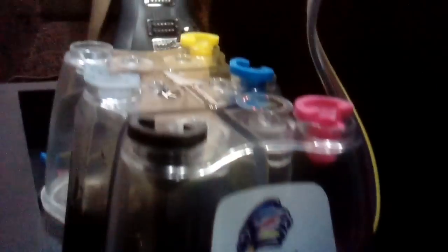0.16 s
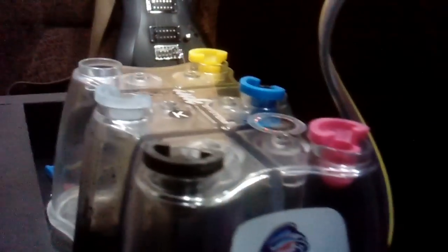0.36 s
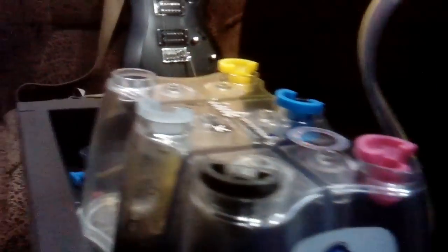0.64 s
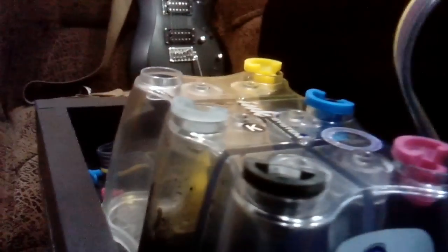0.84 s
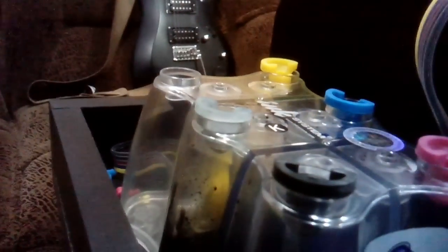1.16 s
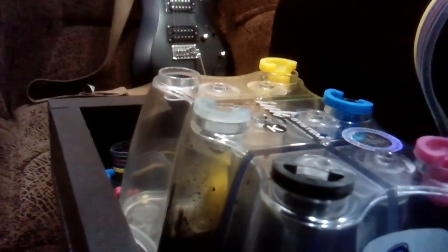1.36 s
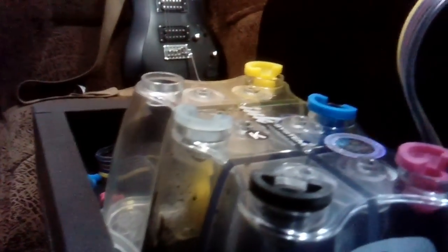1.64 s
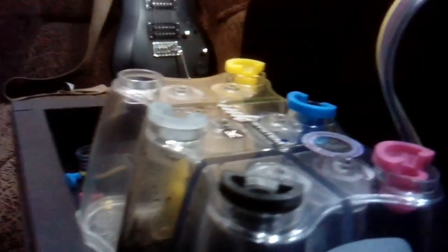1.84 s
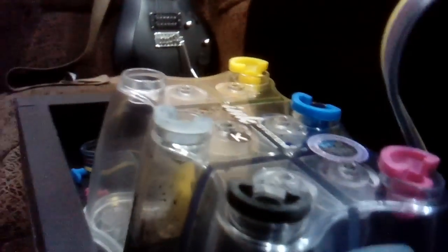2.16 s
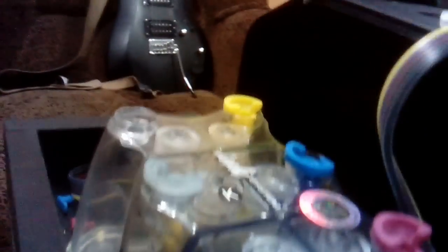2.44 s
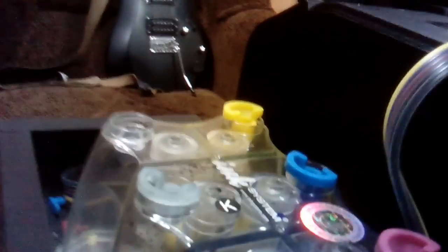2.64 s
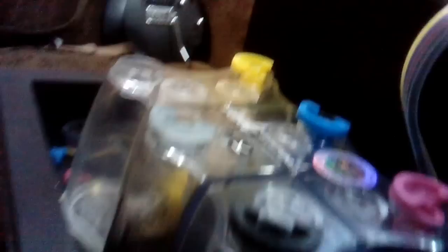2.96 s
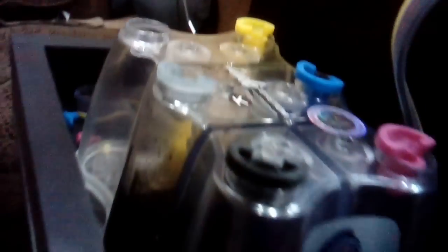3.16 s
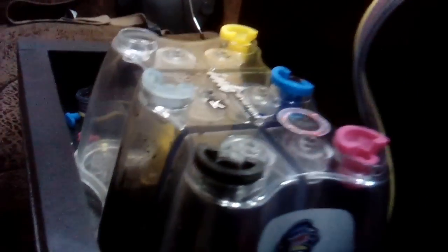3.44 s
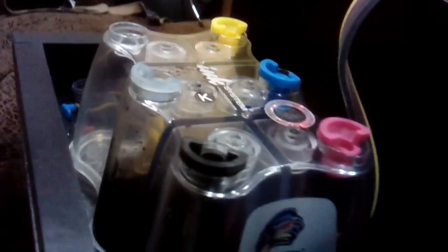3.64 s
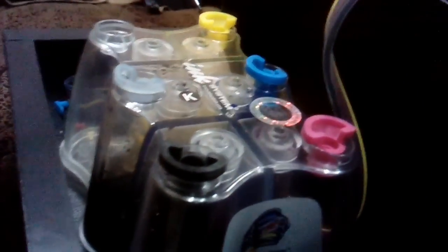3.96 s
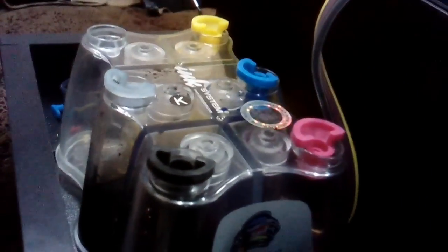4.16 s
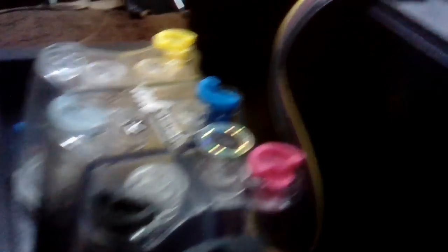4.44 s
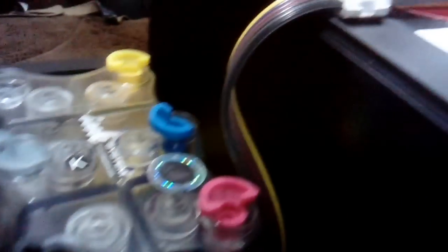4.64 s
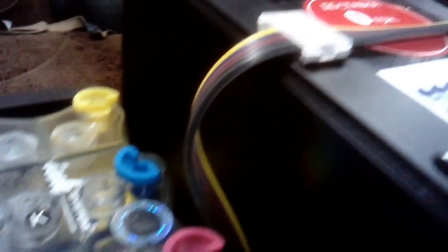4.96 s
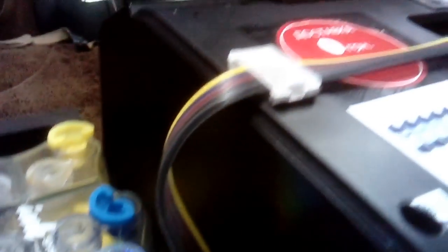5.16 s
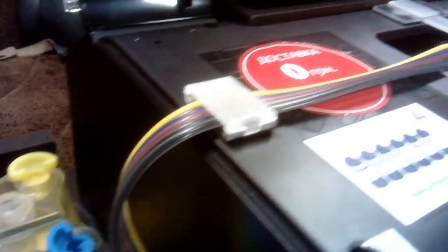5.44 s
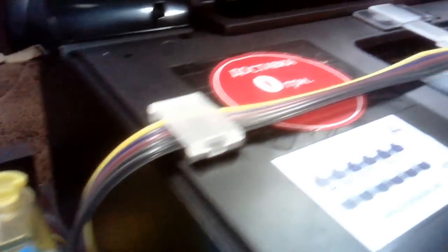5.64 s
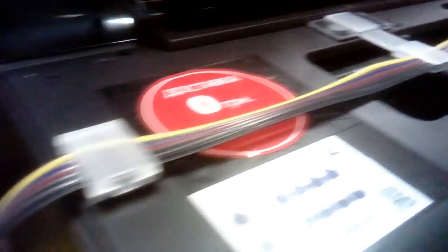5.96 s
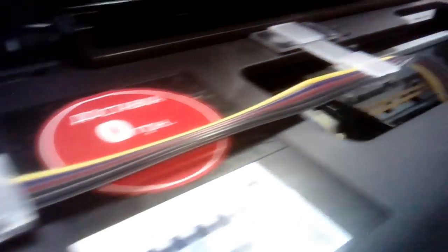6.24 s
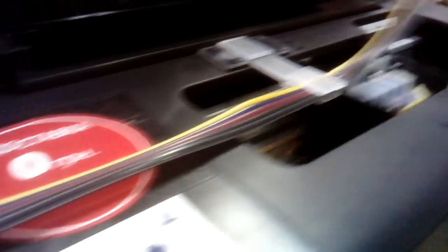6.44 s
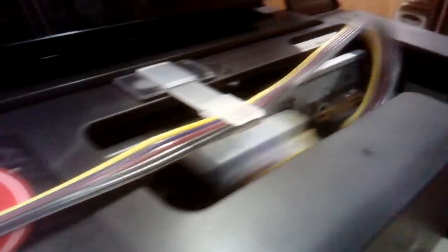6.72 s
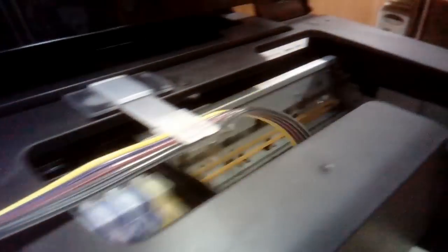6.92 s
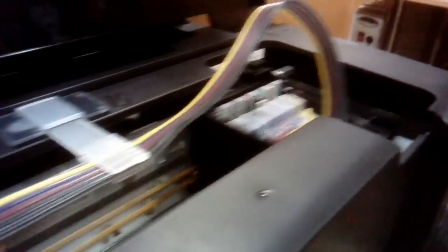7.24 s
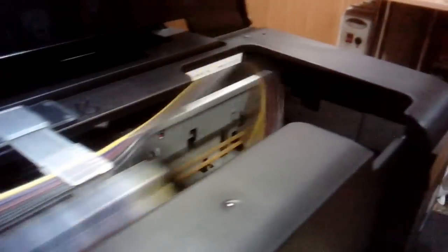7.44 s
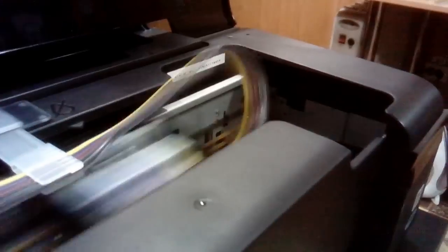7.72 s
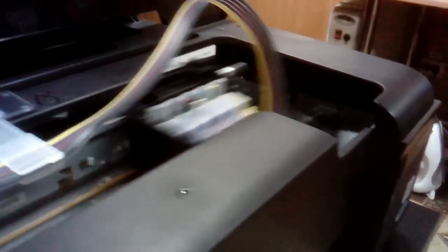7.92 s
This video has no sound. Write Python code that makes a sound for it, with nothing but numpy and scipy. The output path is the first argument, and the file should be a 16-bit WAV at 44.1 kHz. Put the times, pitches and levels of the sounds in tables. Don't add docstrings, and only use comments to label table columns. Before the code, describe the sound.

An inkjet printer carriage runs back and forth in a small furnished room. Each pass brings a quick rising whirr, a loud hollow plastic clack with a double knock, then a slower hissing, whining return with light ticks. The cycle repeats about every 0.7 seconds, rests briefly after three seconds, then resumes. A small handheld microphone gives a close, thin, slightly dull sound.

```python
import sys
import numpy as np
from scipy import signal
from scipy.fft import rfft, irfft, next_fast_len
from scipy.io import wavfile
from scipy.ndimage import uniform_filter1d

SR = 44100
rng = np.random.default_rng(int(sys.argv[2]) if len(sys.argv) > 2 else 0)


def wrap_up_sound(samples):
    columns = np.atleast_2d(samples).T
    tamed = np.clip(columns, -1, 1)
    steps = np.round(tamed * 32767).astype(np.int16)
    wavfile.write(sys.argv[1], SR, steps)


def gain_from_db(level_db):
    decades = np.asarray(level_db, float) / 20
    return 10 ** decades


N = 356769

# clack_s, clack_peak_db, mid_ring_hz, camera_facing_db, latch_tick_db
SHUTTLES = [(-.0145, -11, 1950, -3, -43), (0.6666, -15.5, 1977, -3.5, -32.5),
            (1.3463, -16.5, 1989, -4.5, -34.5), (2.0271, -12.5, 1973, -3.5, -36),
            (2.7078, -11.5, 1956, -4, -28.5), (3.9303, -11, 1990, -1.1, -27),
            (4.6094, -12.5, 1976, -1, -27), (5.29, -13.5, 1969, -1, -30), (5.971, -12.5, 1872, -0.3, -30.5),
            (6.6523, -13.5, 1804, -0.5, -31.5), (7.3331, -13, 1826, -1.5, -32),
            (8.0146, -17, 1709, -2, -34)]

# after_clack_s, tooth_hz
FAST_STROKE = [(-.135, 302), (-.08, 580), (-.06, 679.8), (-.03, 775), (0, 799), (.03, 933), (.085, 1027),
               (.115, 902), (.173, 409.3)]
PRINT_STROKE = [(.191, 320.6), (.215, 479.6), (.24, 535.4), (.265, 550.8), (.283, 568), (.30, 606),
                (.465, 618.8), (.50, 551), (.525, 440.4), (.545, 301)]

# again_s, again_peak_db, rebound_db, turn_db, feed_snap_db
FOLLOWERS = [(0.0047, -24, -29.5, -32.5, -5), (0.0055, -17, -25.5, -33.5, -1),
             (.007, -13.5, -25.5, -30.5, -5), (.007, -19.5, -26, -31.5, -1.5),
             (0.0074, -18.5, -24, -30.5, -16), (.007, -16, -22.5, -26, 3.5), (.0072, -13, -24.5, -29, 4),
             (0.0055, -13.5, -21, -27.5, 4), (0.0085, -15.5, -21.5, -28, 5.5), (0.005, -14.5, -24, -30, 7),
             (0.0029, -17.5, -25.5, -29.5, 5), (0.006, -18, -25, -31, 0)]
# after_clack_s, peak_db, ring_hz
FEED_KNOCK = (.388, -28.5, 1840)
# after_clack_s, peak_db, ring_hz
GEAR_TICK = (.332, -35, 1830)
# after_clack_s, ring_hz
TURN_TICK = (.150, 1530)
# start_s, peak_db
START_KNOCKS = [(0.538, -25), (1.221, -26.5), (1.901, -27.5), (2.579, -30), (3.737, -36.5), (3.814, -22),
                (4.480, -28), (5.165, -26), (5.845, -25.5), (6.527, -25.5), (7.206, -27), (7.889, -27)]
# mode_hz, t60_s, level_db, camera_moved_extra_db
START_MODES = [(170, .08, 4.5, 0.5), (200, 0.083, 5.5, -2), (258, .07, 5, -2), (321, 0.055, -1, -1),
               (372, .06, -3, 2.5), (448, 0.079, -0.5, 3.5), (560, .05, -7.5, 5.5), (640, .05, -10.5, 3.5),
               (837, .045, 7, -4)]
# start_s, peak_db, ring_hz, brightness_db
SETTLE_KNOCK = [(3.367, -42.5, 1586, -1)]

# mode_hz, t60_s, knock_db, rumble_db
FRAME_LOW = [(127, 0.12, -22.5, 8), (194.8, 0.083, -2, 2.5), (268.4, 0.07, -30.5, 3.5),
             (319.5, 0.047, 3, 3), (359.4, 0.07, -12, 3.5), (448.2, 0.095, -2.5, 2), (519, 0.074, -6, 3.5),
             (555, 0.12, 2, -1), (624.5, 0.051, 2, 8), (775, 0.094, 1, -22), (880, 0.13, -3, -16),
             (933, 0.07, 0.5, -25.5), (1121, 0.11, -10.5, -15.5), (1195, 0.079, -2, -13)]
LOW_MOVED_DB = [-0.5, 2, -1.5, 1.5, 4, 5.5, -2.5, 1, -3, 2, 3, -2.5, 10.5, -1.5]
# mode_hz, t60_s, knock_db, rattle_db, camera_moved_extra_db
FRAME_MID = [(1254, 0.015, -18, 10.5, 12), (1429, 0.024, -13, 3.5, 5.5), (1538, 0.026, -13.5, 8.5, 1),
             (1767, 0.025, -17, 2, 1.5), (1871, 0.023, -6, -0.5, 8), (1974, 0.021, 4, 5.5, -5),
             (2026, 0.038, -10.5, -8.5, -2.5), (2126, 0.024, -9.5, -1.5, -9.5),
             (2212, 0.021, -14.5, -9.5, 3.5), (2314, 0.036, -11, 0, 0.5)]
# mode_hz, t60_s, knock_db
FRAME_HIGH = [(2880, 0.027, -12.5), (3310, 0.0029, -1), (3986, 0.016, -9.5), (4260, 0.0097, -9.5),
              (4730, 0.011, -5), (5010, 0.013, -8), (5502, 0.0095, 3.5), (5750, 0.0053, 5.5),
              (6403, 0.0084, 1.5), (6790, 0.0076, 1.5), (7150, 0.0047, 4), (7280, 0.019, -19.5)]
# mode_hz, t60_s, knock_db, rattle_db
BAY_MODES = [(1058, 0.022, 0, 2), (1144, 0.022, 0, -2.7)]
# time_s, level_db
BAY_APPROACH = [(5.5, -27), (6.3, -5.5), (8.1, 1)]

# from_s, to_s, rumble_db, rattle_db
JOLTS = [
    (-.105, -0.035, -48, -57),
    (0.019, 0.036, -33, -39),
    (.06, 0.08, -36, -42),
    (.15, .192, -38, -46.5),
    (.298, 0.309, -36.5, -42),
    (0.343, 0.418, -45.5, -48.5),
    (.495, 0.507, -47.5, -55.5),
]
# after_clack_s, ring_hz, t60_s, early_peak_db,
# later_peak_db
THUMPS = [(-.11, 450, .06, -55.5, -43), (-.1, 297.4, 0.087, -50.5, -45.5), (0.048, 200, 0.07, -33.5, -48),
          (.052, 558, 0.07, -36, -35), (0.097, 187.6, 0.085, -44, -39.5), (.15, 340, 0.11, -43, -41.5),
          (.18, 375, 0.099, -43, -38.5), (.205, 170.7, 0.24, -39, -35), (.17, 800, 0.04, -48, -46),
          (0.13, 1580, .04, -43, -41), (0.31, 457, 0.038, -49.5, -39), (0.39, 320, .08, -43, -47),
          (.40, 190, 0.095, -47.5, -50)]
# after_clack_s, length_s, from_hz, to_hz, level_db
PUSHES = [
    (-.13, 0.08, 478.7, 225, -38.5),
    (0.144, 0.14, 449.9, 151, -42.5),
    (.28, .16, 600, 293, -39.5),
]

# tooth_rate_multiple, level_db
OUT_ORDERS = [(1, -8), (1.6, 1), (2, 2.5), (4, -14), (5, 3)]
BACK_ORDERS = [(1, -7), (2, 1.5), (3, -6), (4, -14), (5, -15), (6, -13), (7, -10)]
# taut_s, slack_s, level_db, rise_db_per_s
PULLS = [
    (-.062, 0.012, -46, 10),
    (0.255, 0.484, -42, -31),
]
# after_clack_s, first_order_db, second_early_db, second_later_db, higher_db
TENSION = [(.24, -14, -6, 0, -18), (.28, -11, -2, 4, -16), (.30, 1, 1.5, 2, 0), (.32, 1, 5, 6, 0),
           (.34, -3, -3, 1, 2), (.36, -10, 2.5, 5, 1), (.38, -20, -1, 2.5, 1), (.40, 6, 0, 1, 1),
           (.42, 4, -6, 2.5, 0), (.44, 1, -14, -4, 1), (.465, 1, -5, 3, -1), (.48, 0, -2, -4, -4),
           (.5, -1, -8, -9, -6)]
# centre_hz, width_hz, level_db
RADIATION = [(605, 90, 0), (790, 90, -3), (1155, 45, -6), (1222, 50, 0), (1500, 160, -.5), (1835, 150, .3),
             (2450, 200, -2.5), (3750, 600, -2.5), (4900, 500, -.6), (5600, 700, -1.5), (6900, 900, -.7)]

# freq_hz, density_db_per_hz
OUT_HISS = [(1290, -33), (2200, -14), (2750, -19), (3800, -5.5), (4130, -8.5), (4950, -6.5), (6910, -3.5),
            (7360, -2.5), (7800, -17.5), (10100, -42), (17200, -120)]
BACK_HISS = [(1290, -33.5), (2200, -8), (2720, -17), (3640, -12), (4000, -8.5), (6080, -7), (6940, -2),
             (7400, -3), (7800, -20.5), (10100, -68.5), (17200, -120)]

# freq_hz, gain_db
SMALL_BODY = [(25, -18.5), (100, -19.5), (160, -7.5), (250, 2), (2300, -2.07), (2700, 4.5), (3300, 0.09)]
# freq_hz, gain_db
LID_DIP = [(2100, -40), (2350, 0), (2950, 0), (3250, -40)]
# time_s, share_0_to_1
LID_SHARE = [(0, .3), (5.6, .3), (6.4, .6), (8.1, .65)]
CAMERA_MOVES_S = (3.3, 4.8)

# freq_hz, density_db_per_hz
ROOM_AIR = [(24, -69), (40, -40), (76, -14.5), (172, 3.5), (224, -11), (406, -1.5), (552, -9.5),
            (603, -3.5), (804, -11.5), (1400, -11), (2890, -18), (5130, -16.5), (7800, -18), (10100, -58.5),
            (17200, -120)]
# hum_hz, level_db
HUM = [(602.9, -74)]
# freq_hz, gain_db
MICROPHONE = [(7200, 0.97), (7500, -4), (7750, -10), (7900, -67)]
# freq_hz, gain_db
IMAGE = [(8150, -6.5), (8500, -15), (8900, -41.5), (9300, -40.5), (11000, -50.5), (14000, -64),
         (16000, -88)]

CRUISE_HZ, WAVER = 611, .004
TURN_S, REVERSE_S = 0.19, .182
LINGER_S, PARK_S, UNPARK_S = .005, .07, .065
HISS_FACING, RUMBLE_FACING, RUMBLE_TRIM_DB = 0.48, 0.77, -4

REBOUND_S, LATCH_S, LATCH_HZ, START_HZ = .06, .288, 1769, 1520
SOFT_REBOUND_EARLY_S = 0.0067
BLOW, BLOW_S = 6, .0004
SAME_KNOCK, SAME_SHAKE = .85, .7
JOLT_RISE_DB_PER_S, JOLT_FALL_DB_PER_S = 799, 425
THUMP_RISE_S = 0.0061
GROWL_SAG_DB = -10
TAUT_DB_PER_S, SLACK_DB_PER_S = 445, 513

HISS_POWER, BRAKE_DB, FULL_BRAKE_HZ_PER_S, AWAY_DB_PER_S = 4.56, -4.5, 7300, -21.5
FAST_KNEE_HZ, FAST_HISS_DB, PRINT_KNEE_HZ, PRINT_HISS_DB = 751, -38.5, 600, -39.5
RATTLE_UNDER_HISS_DB, RUN_UP_DB = -8, -3
UNLATCHED_DB = -2.5
RAIL_RING_DB, RAIL_RING_T60_S = -18.5, 0.14
TEETH_PER_TURN, PULLEY_SHARE, SAME_RAIL = 4, .4, .5
ROOM_DB, FIRST_SR = -62.5, 16000


def level(x, db):
    return x * gain_from_db(db) / np.sqrt(np.mean(x ** 2))


def colour(x, points):
    size = next_fast_len(len(x) + SR // 4)
    hz, db = np.transpose(points)
    at = np.log(np.fft.rfftfreq(size, 1 / SR) + 1)
    gain = gain_from_db(np.interp(at, np.log(hz), db))
    return irfft(rfft(x, size) * gain, size)[:len(x)]


def walk(rate):
    k = int(SR / rate)
    steps = np.repeat(rng.standard_normal(N // k + 1), k)
    return 1.3 * uniform_filter1d(uniform_filter1d(steps, k), k)[:N]


def ring(modes, gains_db):
    t = np.arange(int(.75 * max(m[1] for m in modes) * SR)) / SR
    signs = (-1) ** np.arange(len(modes))
    gains = signs * gain_from_db(np.array(gains_db))
    return sum(g * np.sin(2 * np.pi * m[0] * t) * np.exp(-np.log(1000) * t / m[1])
               for m, g in zip(modes, gains))


def moved(t):
    return np.interp(t, CAMERA_MOVES_S, (0, 1))


def held(s, start, end, rise_db, fall_db):
    return -rise_db * np.maximum(start - s, 0) - fall_db * np.maximum(s - end, 0)


def shuttle_laws(s):
    hz = np.interp(s, *np.transpose(FAST_STROKE + PRINT_STROKE))
    slowing = -uniform_filter1d(np.gradient(hz, s), size=40)
    braking = np.clip(slowing / FULL_BRAKE_HZ_PER_S, 0, 1)
    back = s > REVERSE_S
    slow = np.minimum(hz / np.where(back, PRINT_KNEE_HZ, FAST_KNEE_HZ), 1)
    print_db = PRINT_HISS_DB + AWAY_DB_PER_S * np.maximum(s - LATCH_S, 0)
    top_db = np.where(back, print_db, FAST_HISS_DB)
    hiss_db = top_db + 20 * HISS_POWER * np.log10(slow) + BRAKE_DB * braking
    whine_db = np.max([db + rise * (s - a) + held(s, a, b, TAUT_DB_PER_S, SLACK_DB_PER_S)
                       for a, b, db, rise in PULLS], axis=0)
    jolts = np.array([held(s, a, b, JOLT_RISE_DB_PER_S, JOLT_FALL_DB_PER_S) for a, b, _, _ in JOLTS])
    rumble_db, rattle_db = (np.max(jolts + db[:, None], axis=0) for db in np.transpose(JOLTS)[2:])
    running_db = hiss_db + RATTLE_UNDER_HISS_DB + RUN_UP_DB * (s < 0)
    return hz, whine_db, hiss_db, rumble_db, np.maximum(rattle_db, running_db)


def motion():
    clack, _, _, facing, _ = np.transpose(SHUTTLES)
    marks = np.array([FAST_STROKE[0][0], -.07, -.02, .4, .46, PRINT_STROKE[-1][0]])
    pause = np.diff(clack) > 1
    late = LINGER_S + PARK_S * np.append(pause, 0)
    early = UNPARK_S * np.append(0, pause)
    t = np.arange(N) / SR

    def within(lead):
        real = clack[:, None] + marks
        real = real + np.outer(late, [0, 0, 0, 0, 1, 1]) - np.outer(lead, [1, 1, 0, 0, 0, 0])
        nominal = np.arange(len(clack))[:, None] + marks
        lap = np.interp(t, np.maximum.accumulate(real.ravel()), nominal.ravel())
        return (lap - marks[0]) % 1 + marks[0]

    moving = within(early)
    s = within(0 * early)
    grid = np.arange(marks[0], marks[-1], 1 / 1000)
    laws = shuttle_laws(grid)
    hz, whine_db, hiss_db, rattle_db = (np.interp(moving, grid, laws[k]) for k in (0, 1, 2, 4))
    rumble_db = np.interp(s, grid, laws[3])
    face_db = np.interp(t, clack + .2, facing)
    low_db = RUMBLE_TRIM_DB + RUMBLE_FACING * face_db
    rest_db = -40 * (moving > marks[-1])
    return (s, hz, whine_db + face_db + rest_db, hiss_db + HISS_FACING * face_db + rest_db,
            rumble_db + low_db + rest_db, rattle_db + face_db + rest_db, low_db)


def knocks(table, rattle_s, fade_s, trim_db, first=4, low=FRAME_LOW,
           ring_db=-1.2, ring_s=.019, later_db=0., mid_db=0.):
    out, pad = np.zeros(N + 2 * SR), SR
    t = np.arange(SR // 20) / SR
    shape = np.exp(-np.maximum(t - rattle_s, 0) / fade_s)
    blow = BLOW * first * (np.arange(len(t)) == int(BLOW_S * SR))
    same = rng.standard_normal(len(t))
    swell = (1 - np.exp(-t / 0.0017), 1, np.exp(-t / 0.032))
    for (s, peak_db, hz, bright_db), snap_db in zip(table, np.broadcast_to(mid_db, len(table))):
        own = rng.standard_normal(len(t))
        rattle = (np.sqrt(SAME_KNOCK) * same + np.sqrt(1 - SAME_KNOCK) * own) * shape + blow
        middle = sorted(FRAME_MID + [(hz, ring_s, ring_db, 0, 0)])
        banks = (low, middle, FRAME_HIGH)
        mid_shift_db = moved(s - 1.5) * np.array([m[4] for m in middle])
        shift_db = (moved(s) * np.array(later_db), mid_shift_db, 0)
        bank_db = peak_db + np.add(trim_db, (0, snap_db, bright_db))
        for modes, db, w, more_db in zip(banks, bank_db, swell, shift_db):
            gains_db = np.array([m[2] for m in modes]) + more_db + 1.0 * rng.standard_normal(len(modes))
            hit = signal.fftconvolve(rattle * w, ring(modes, gains_db))
            i = pad + int(s * SR)
            out[i:i + len(hit)] += gain_from_db(db) * hit / np.abs(hit).max()
    return out[pad:pad + N]


def latch_train():
    clack, db, hz, face_db, latch_db = np.transpose(SHUTTLES)
    again_s, again_db, rebound_db, turn_db, snap_db = np.transpose(FOLLOWERS)

    def rows(*cols):
        return np.transpose(np.broadcast_arrays(*cols, 0.))

    def after(knock, share):
        return rows(clack + knock[0], knock[1] + share * face_db, knock[2])[:-1]

    out = knocks(rows(clack, db, hz), 0.0047, 0.01, (-7, .9, -.4),
                 first=2.83, ring_db=7.0, later_db=LOW_MOVED_DB)
    out += knocks(rows(clack + again_s, again_db, hz), 0.003, 0.0063, (-8, -.9, -2.5),
                  first=1.4, ring_db=2.5, later_db=LOW_MOVED_DB)
    rebound_s = clack + REBOUND_S - SOFT_REBOUND_EARLY_S * np.append(0, np.diff(clack) > 1)
    out += knocks(rows(rebound_s, rebound_db, hz), 0.003, 0.0035, (-5, .9, -3),
                  first=1.9, ring_db=3.5, later_db=LOW_MOVED_DB)
    out += knocks(rows(clack + TURN_TICK[0], turn_db, TURN_TICK[1])[:-1], 0.0042, 0.004, (-4, -2, -2))
    out += knocks(rows(clack + LATCH_S, latch_db, LATCH_HZ)[:-1], 0.0032, 0.003, (-18, 2.5, 3.5),
                  first=6, ring_db=-5.5, ring_s=0.016)
    out += knocks(after(FEED_KNOCK, 0.5), 0.0039, 0.0071, (-3, -3, -16),
                  first=6.7, low=FRAME_LOW[2:9], ring_db=16.0, mid_db=snap_db[:-1])
    out += knocks(after(GEAR_TICK, 0.79), 0.0018, 0.0018, (-14, 0, -16), first=6.9, ring_db=10.0)
    out += knocks(rows(*np.transpose(START_KNOCKS), START_HZ), 0.0015, 0.012, (-9, -19, -23),
                  first=1.8, low=START_MODES, ring_db=7.0, later_db=[m[3] for m in START_MODES])
    return out + knocks(SETTLE_KNOCK, 0.0054, 0.013, (-.6, -25, -30), low=FRAME_LOW[:3])


def shake(s, modes, db, lumpy_db, rate):
    own, same = (rng.standard_normal(N) * gain_from_db(lumpy_db * walk(rate)) for _ in range(2))
    place = ((s - s.min()) * SR).astype(int)
    push = np.sqrt(SAME_SHAKE) * same[place] + np.sqrt(1 - SAME_SHAKE) * own
    shaken = signal.fftconvolve(push, ring(modes, [m[3] for m in modes]))[:N]
    return gain_from_db(db) * level(shaken, 0)


def thumps():
    out, t = np.zeros(N + 2 * SR), np.arange(SR // 5) / SR
    chances = rng.standard_normal((len(SHUTTLES), len(THUMPS), 2))
    for clack, chance in zip(np.transpose(SHUTTLES)[0], chances):
        for (s, hz, t60, db, later_db), (detune, lift) in zip(THUMPS, chance):
            i = SR + int((clack + s) * SR)
            swell = (1 - np.exp(-t / THUMP_RISE_S)) ** 2 * np.exp(-np.log(1000) * t / t60)
            wave = np.sin(2 * np.pi * hz * (1 + .02 * detune) * t) * swell / swell.max()
            out[i:i + len(t)] += gain_from_db(db + (later_db - db) * moved(clack) + 1.5 * lift) * wave
    return out[SR:SR + N]


def whine(s, back, hz, db):
    hz = np.where(back, np.minimum(1.03 * hz, CRUISE_HZ), hz) * (1 + WAVER * walk(30))
    phase = 2 * np.pi * np.cumsum(hz) / SR
    grid = np.arange(0, SR / 2, 10)
    response = np.sqrt(sum(gain_from_db(2 * g) / (1 + (2 * (grid - c) / w) ** 4) for c, w, g in RADIATION))
    at, *tension = np.transpose(TENSION)
    first, early, later, higher = (np.interp(s[back], at, d) for d in tension)
    turned = moved(np.arange(N) / SR)[back]
    tension_db = first + 4 * (1 - turned), early + (later - early) * turned, higher

    def tone(orders, rough, on):
        total = 0
        for k, g in orders:
            gain = gain_from_db(g + 5 * rough * walk(60)[on]) * np.interp(k * hz[on], grid, response)
            total = total + gain * np.sin(k * phase[on] + rough * np.sqrt(k) * walk(150)[on])
        return total

    out = np.zeros(N)
    out[~back] = tone(OUT_ORDERS, .3, ~back)
    out[back] = tone([(k, g + tension_db[min(k, 3) - 1]) for k, g in BACK_ORDERS], .16, back)
    return np.sqrt(2) * gain_from_db(db) * out


def hiss(s, hz, back, db, unlatched):
    turn = np.cumsum(hz) / SR / TEETH_PER_TURN % 1
    rims = rng.standard_normal((2, 300))
    lean = 0.8 * walk(25)
    pulley = sum(w * np.interp(turn, np.linspace(0, 1, rim.size), rim)
                 for rim, w in zip(rims, (np.cos(lean), np.sin(lean))))
    own, same = (rng.standard_normal(N) * gain_from_db(2.6 * walk(300)) for _ in range(2))
    place = ((s - s.min()) * SR).astype(int)
    rough = np.sqrt(SAME_RAIL) * same[place] + np.sqrt(1 - SAME_RAIL) * own
    rough = np.sqrt(1 - PULLEY_SHARE) * level(rough, 0) + np.sqrt(PULLEY_SHARE) * level(pulley, 0)
    out, ret = (level(colour(rough, points), 0) for points in (OUT_HISS, BACK_HISS))
    rail = ring([(m[0], RAIL_RING_T60_S) for m in FRAME_HIGH], [m[2] / 2 for m in FRAME_HIGH])
    both = np.where(back, ret, out)
    both = level(both + level(signal.fftconvolve(both, rail)[:N], RAIL_RING_DB), 0)
    low = colour(both, [(4800, 0), (5600, -40)])
    slow_db = np.minimum(0.4 * (db + 41.5), 0) + UNLATCHED_DB * unlatched
    return gain_from_db(db + 1.02 * walk(30)) * (both - low + low * gain_from_db(slow_db + 2.1 * walk(25)))


def growl(s, low_db):
    hz, gain = np.full(N, 200.), np.zeros(N)
    for start, length, from_hz, to_hz, db in PUSHES:
        u = (s - start) / length
        on = (u > 0) & (u < 1)
        hz = np.where(on, from_hz * (to_hz / from_hz) ** np.clip(u, 0, 1), hz)
        gain += on * gain_from_db(db + GROWL_SAG_DB * u * on) * np.abs(np.sin(np.pi * u)) ** 0.22
    gain = gain * gain_from_db(low_db + 3.0 * walk(60))
    return gain * np.sin(2 * np.pi * np.cumsum(hz) / SR + 2.4 * walk(120))


def room_floor():
    t = np.arange(N) / SR
    hum = sum(np.sqrt(2) * gain_from_db(db + 1.5 * walk(10)) * np.sin(2 * np.pi * hz * t) for hz, db in HUM)
    return level(colour(rng.standard_normal(N), ROOM_AIR), ROOM_DB) * gain_from_db(0.29 * walk(11)) + hum


def scene():
    s, hz, whine_db, hiss_db, rumble_db, rattle_db, low_db = motion()
    back = s > TURN_S
    t = np.arange(N) / SR
    printer = whine(s, back, hz, whine_db)
    printer += hiss(s, hz, back, hiss_db, back & (s < LATCH_S))
    printer += growl(s, low_db)
    printer += shake(s, FRAME_LOW, rumble_db, 3.5, 45)
    printer += shake(s, FRAME_MID, rattle_db, 3.5, 110)
    printer += shake(s, BAY_MODES, rattle_db + np.interp(t, *np.transpose(BAY_APPROACH)), 2.6, 60)
    printer = colour(printer + latch_train() + gain_from_db(-2.0) * thumps(), SMALL_BODY)
    printer = printer - np.interp(t, *np.transpose(LID_SHARE)) * colour(printer, LID_DIP)

    tail_t = np.arange(SR // 2) / SR
    decay = np.exp(-np.log(1000) * tail_t / 0.46)
    tail = rng.standard_normal(len(tail_t)) * decay * (tail_t > .004)
    tail = colour(tail, [(300, -0.5), (2000, -6.0), (7000, -8.5)])
    echo = signal.fftconvolve(printer, tail / np.sqrt(np.sum(tail ** 2)))[:N]
    return (printer + gain_from_db(-13) * echo + room_floor())[None]


def low_pass(x):
    return signal.sosfilt(signal.butter(12, 14800, fs=SR, output="sos"), x)


def record(dry):
    x = colour(dry[0], MICROPHONE)
    mirror = 2 * x * np.cos(2 * np.pi * FIRST_SR * np.arange(N) / SR)
    x = x + colour(mirror, [(FIRST_SR / 2, -120)] + IMAGE)
    return low_pass(x[None])


dry = scene()
out = record(dry)
wrap_up_sound(out)
```